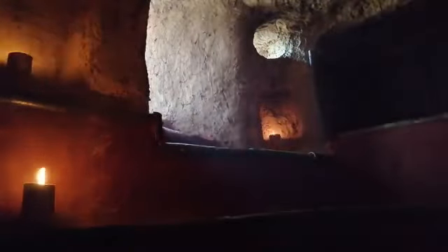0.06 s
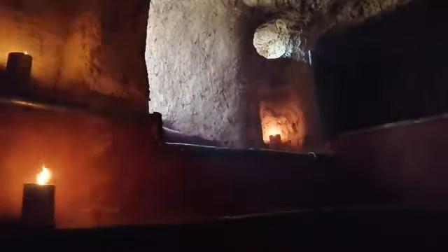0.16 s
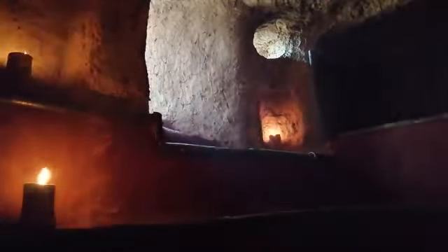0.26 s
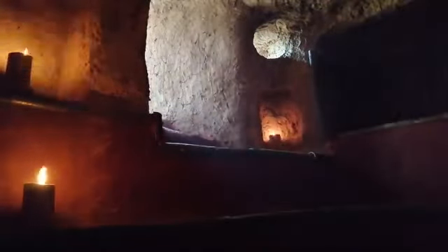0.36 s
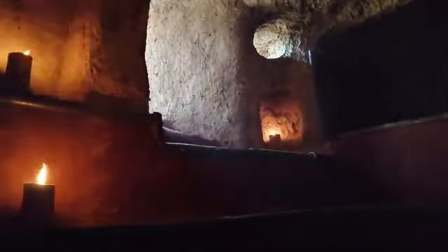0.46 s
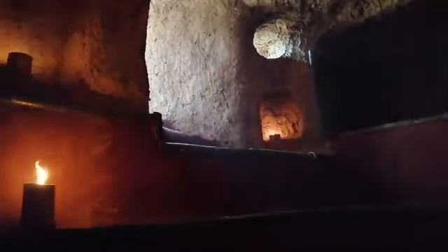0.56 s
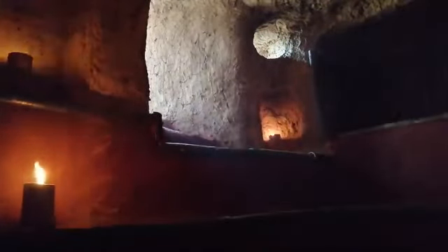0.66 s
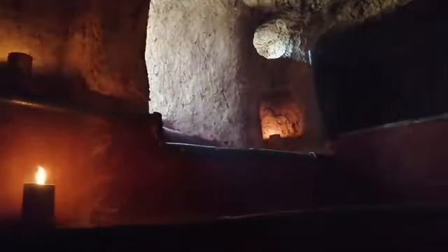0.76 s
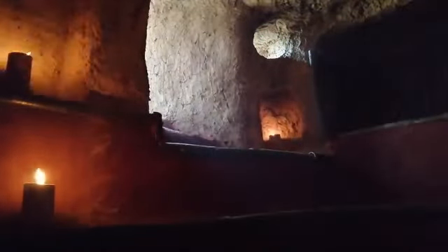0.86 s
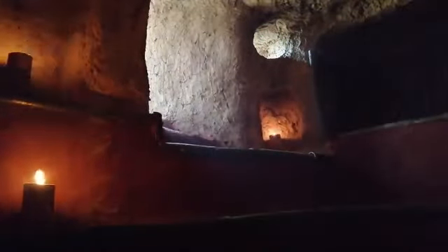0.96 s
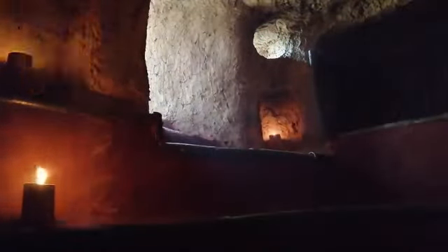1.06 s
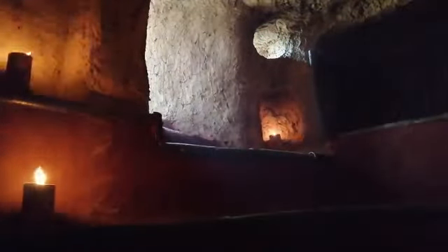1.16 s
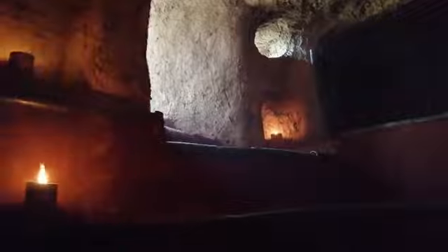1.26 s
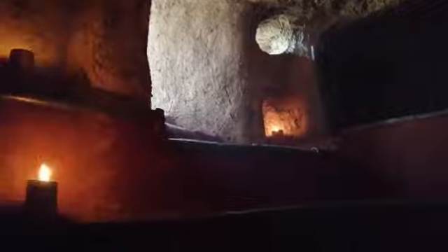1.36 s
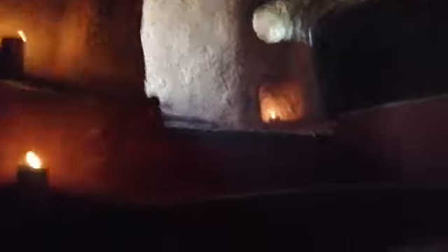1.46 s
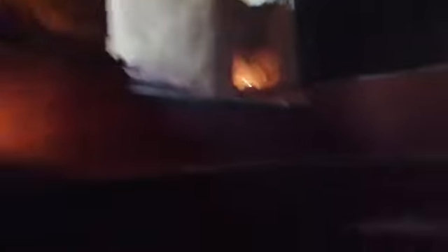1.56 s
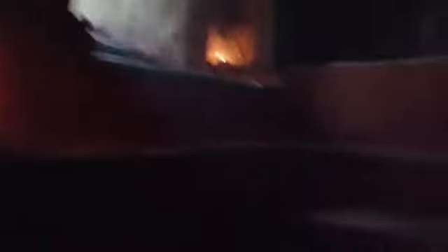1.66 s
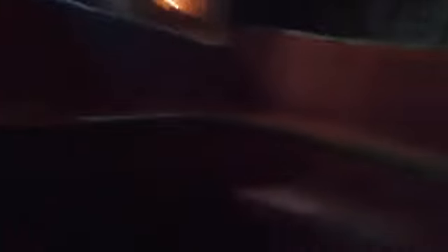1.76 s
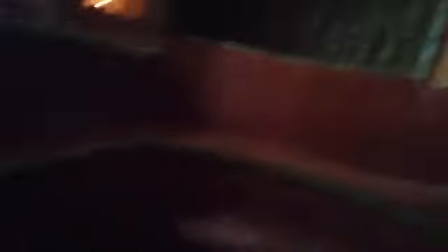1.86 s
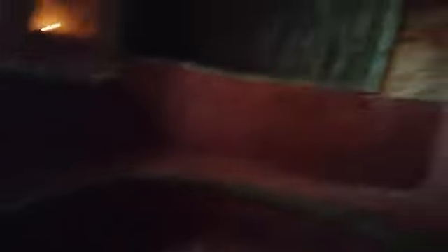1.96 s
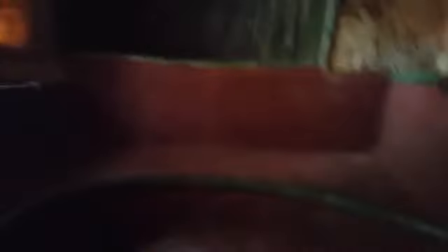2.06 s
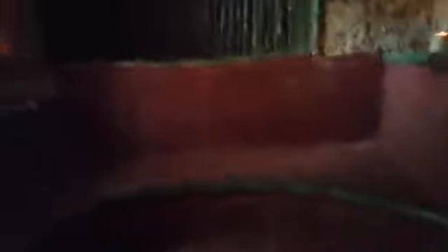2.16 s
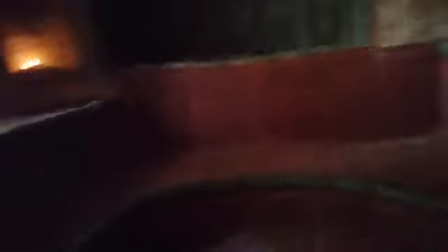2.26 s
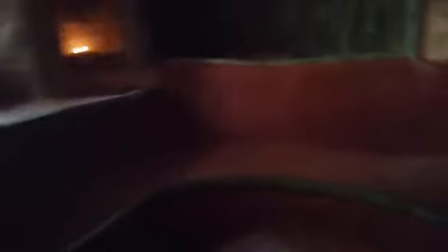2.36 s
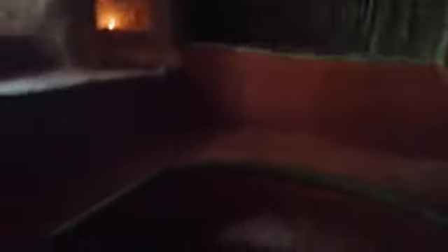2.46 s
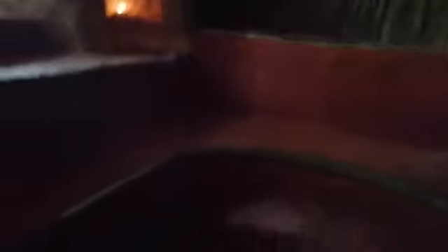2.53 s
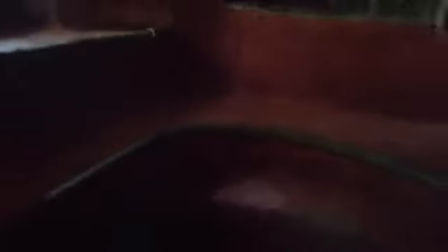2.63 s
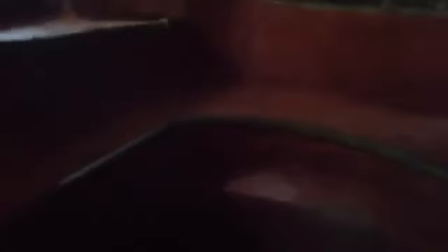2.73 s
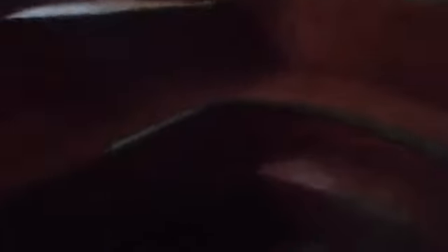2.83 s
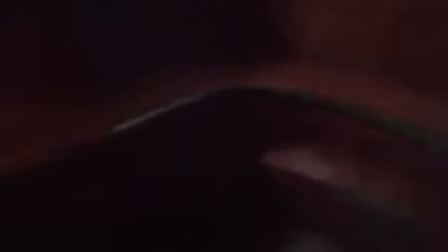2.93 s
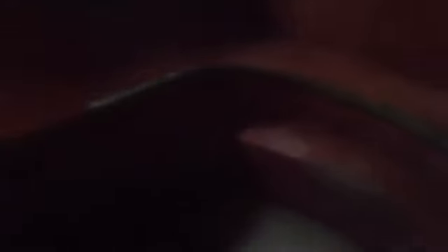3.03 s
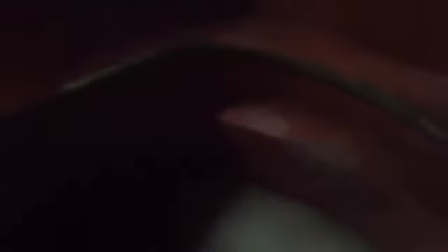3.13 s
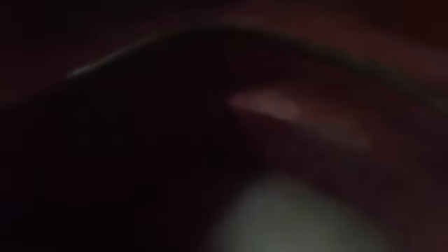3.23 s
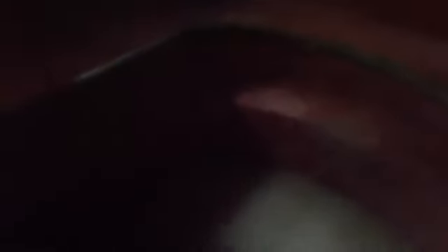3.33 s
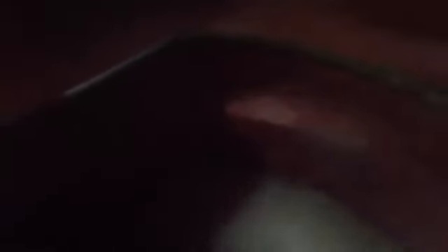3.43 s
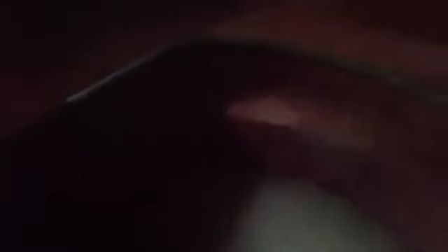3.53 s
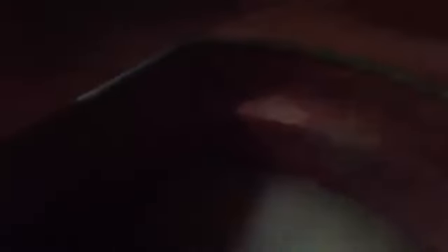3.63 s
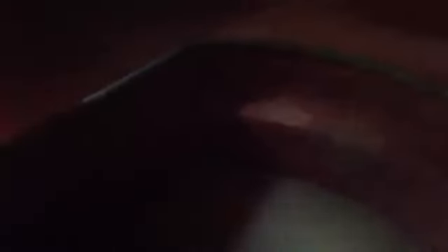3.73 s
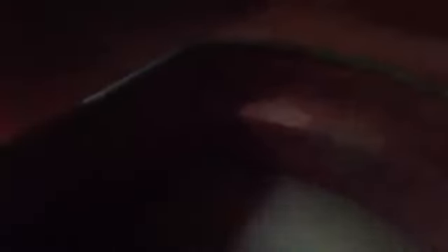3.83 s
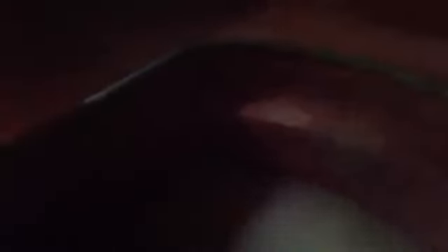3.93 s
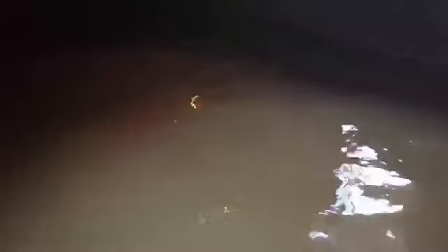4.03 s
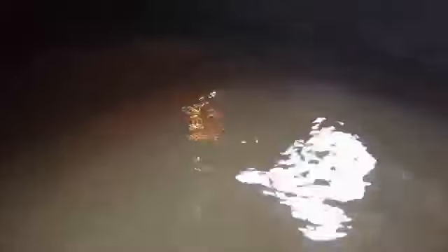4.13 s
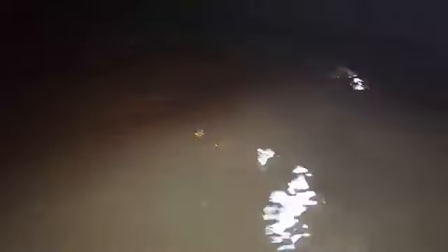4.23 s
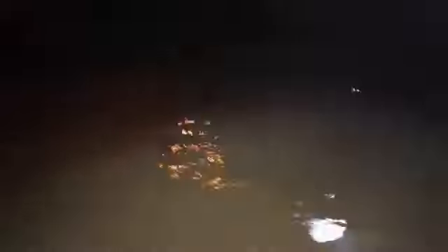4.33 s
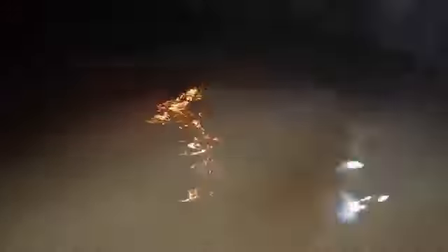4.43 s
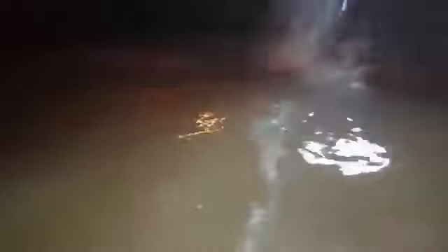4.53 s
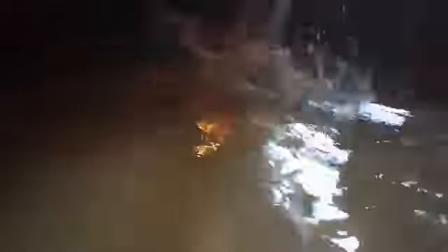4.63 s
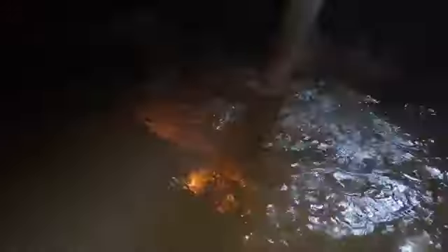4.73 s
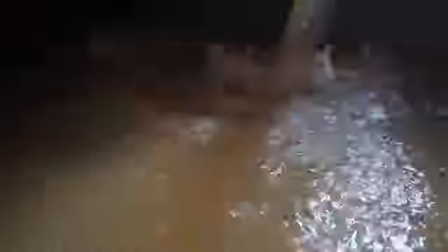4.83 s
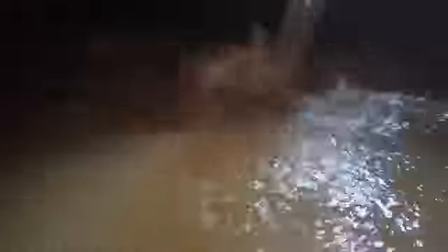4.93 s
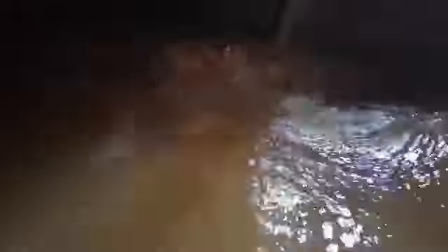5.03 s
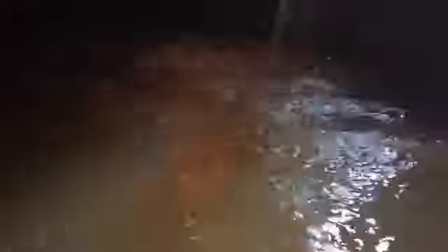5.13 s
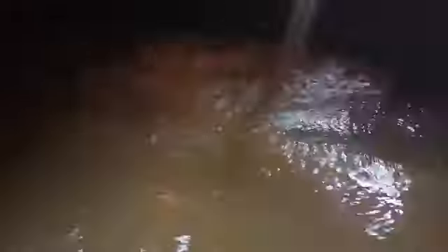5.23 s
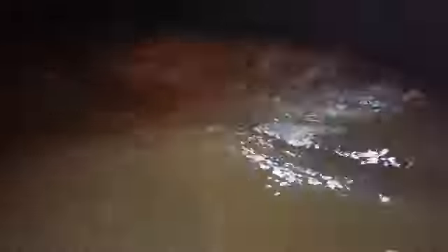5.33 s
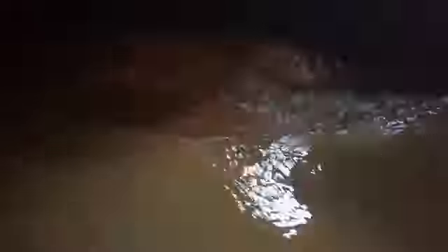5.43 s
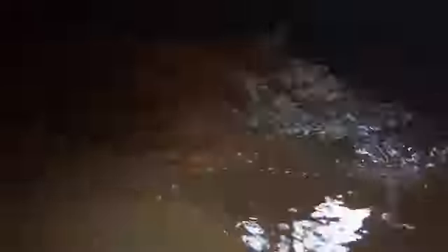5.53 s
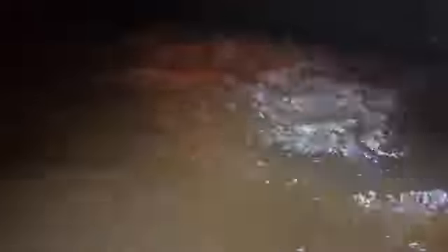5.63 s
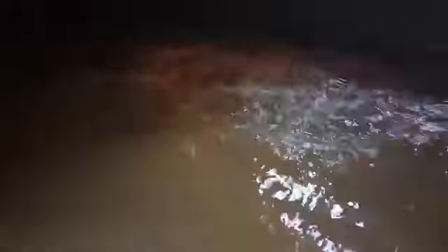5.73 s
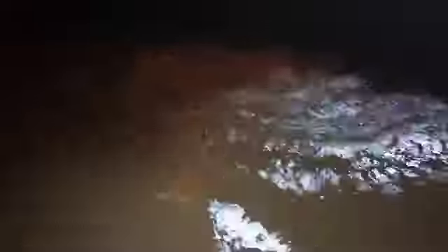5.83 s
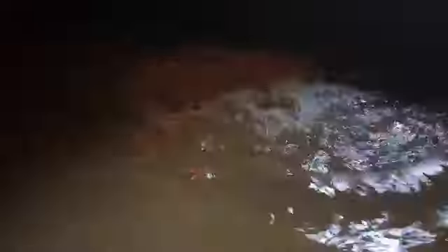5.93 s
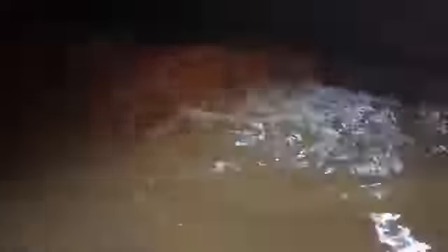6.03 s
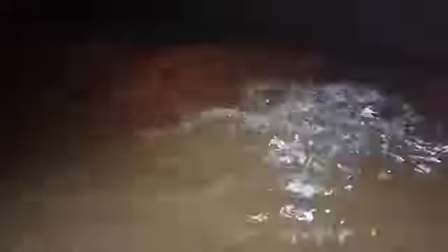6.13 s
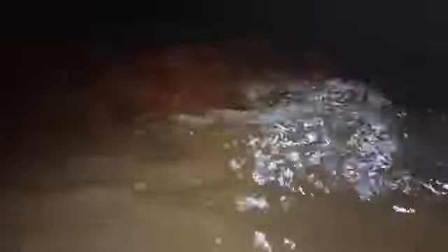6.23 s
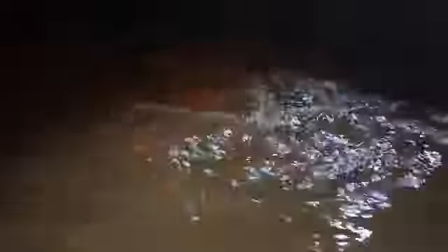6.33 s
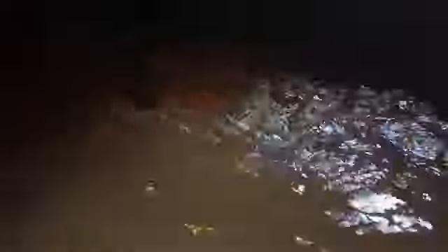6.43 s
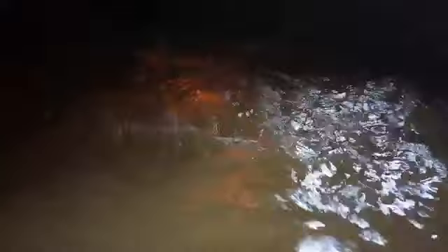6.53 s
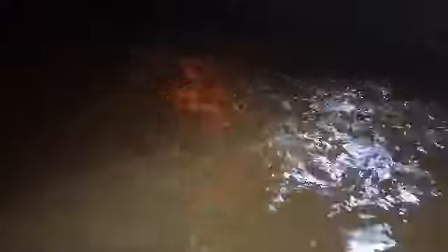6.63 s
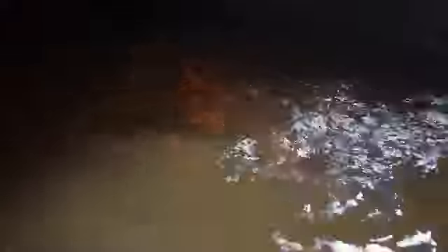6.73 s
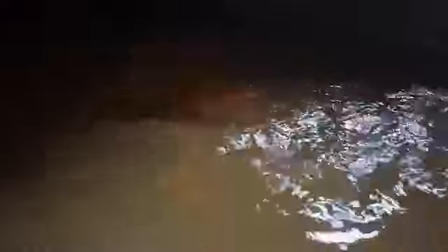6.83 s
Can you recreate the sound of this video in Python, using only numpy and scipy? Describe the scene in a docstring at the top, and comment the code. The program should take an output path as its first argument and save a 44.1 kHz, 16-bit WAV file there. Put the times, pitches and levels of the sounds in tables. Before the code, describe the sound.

Close to the water in a small hard-walled room: over a second of near-quiet room tone, then lively uneven sloshing with droplets, gurgles and rounded plops shifting slightly left and right. After a momentary hush and light ripples, a dense splashing pour, by far the loudest event, rings the basin over deep air-pocket booms. It stops fast, leaving gurgles, fine fizz and isolated drips fading away.

```python
"""A small stone pool in a plastered chamber: rumble, hiss and short soft noise swells, then a faint squeak.
Water is stirred: filtered noise and bubble clouds swish, noise bursts slap, decaying sines plop and boom.
The level drops out briefly; after two faint strokes a stream pours in for about a second: a dense
bubble cloud rings the basin over booming air pockets. Then the foam fizzes out with a few last drips."""
import sys
import numpy as np
from scipy import signal
from scipy.fft import rfft, irfft
from scipy.io import wavfile
from scipy.ndimage import uniform_filter1d

SR = 44100
rng = np.random.default_rng(int(sys.argv[2]) if len(sys.argv) > 2 else 0)


def unload_audio(sound):
    """Save the sound as a 16-bit wav file, at the path given as the first command line argument."""
    columns = np.transpose(np.atleast_2d(sound))
    # keep every value between -1 and 1, then stretch to whole-number steps
    steps = np.round(np.clip(columns, -1, 1) * 32767)
    wavfile.write(sys.argv[1], SR, steps.astype(np.int16))


N = 303496
TIME = np.arange(N) / SR


def amp(db):
    """Amplitude ratio from dB."""
    return 10 ** (np.asarray(db) / 20)


def unit(x):
    """Scale to rms 1."""
    return x / np.sqrt(np.mean(x ** 2) + 1e-20)


def read(points, hz):
    """Interpolate a table over frequency on a log axis."""
    f, value = np.transpose(points)
    return np.interp(np.log(hz + 1), np.log(f + 1), value)


def level(rows):
    """Gain at every sample from rows of (t/s, level/dB)."""
    return amp(np.interp(TIME, *np.transpose(rows)))


def during(start_s, end_s, fade_s=0.0041):
    """One between two times, with short linear fades centred on them."""
    inside_s = np.minimum(TIME - start_s, end_s - TIME)
    return np.clip(inside_s / fade_s + .5, 0, 1)


def shaped(x, gain):
    """Filter by a gain given as a function of Hz; rms 1."""
    hz = np.fft.rfftfreq(x.shape[-1], 1 / SR) + 1
    return unit(irfft(rfft(x) * gain(hz), x.shape[-1]))


def coloured(x, colour):
    """Filter by a colour table; rms 1."""
    return shaped(x, lambda hz: amp(read(colour, hz)))


def add(mix, start_s, sound):
    """Add a sound into the mix in place, cut at the end."""
    part = mix[:, max(round(start_s * SR), 0):][:, :sound.shape[-1]]
    part += sound[..., :part.shape[1]]


def bass_noise(colour, apart):
    """Stereo noise: the longer the wave, the more alike it reaches both ears."""
    mid, side = rng.standard_normal((2, N))
    width = np.minimum(np.fft.rfftfreq(N, 1 / SR) / 130, 1.6)
    side = apart * irfft(rfft(side) * width, N)
    return coloured(np.array([mid + side, mid - side]), colour)


def bubble(hz, t60_s, rise_oct_per_s, swell_s, lead_rad=0):
    """An air bubble rings at both ears as a decaying sine; its pitch slides up by at most an octave, or down
    without limit."""
    t = np.arange(int((swell_s + t60_s) * SR) + 8) / SR
    turns = np.cumsum(hz * 2 ** np.minimum(rise_oct_per_s * t, 1)) / SR
    swell = np.sin(np.pi / 2 * np.minimum(t / swell_s, 1)) ** 2
    decay = 1000. ** (-np.maximum(t - swell_s, 0) / t60_s)
    ear_phase = np.array([[lead_rad], [-lead_rad]]) / 2
    return swell * decay * np.sin(2 * np.pi * turns + ear_phase)


def cloud(rate, spread_db, cycles, mist, count=400):
    """Countless small bubbles, a few of them loud, over smooth noise; the smallest are the most numerous."""
    out = np.zeros((2, N))
    # rate scales the bubbles per second, in proportion to pitch; cycles is the mean t60 in periods at 2 kHz
    for hz, (length, bend, lead) in zip(np.geomspace(300, 14500, count), rng.random((count, 3))):
        t60_s = cycles * (.5 + length) / np.sqrt(hz * 2000)
        ring = bubble(hz, t60_s, 0.56 * bend / t60_s, 1 / hz, 2 * np.pi * lead)
        number = int(rate * TIME[-1] / count * hz / 2000) + 1
        starts_s = rng.uniform(0, TIME[-1], number)
        sizes = amp(spread_db * np.minimum(rng.exponential(1, number), 3))
        for start_s, size in zip(starts_s, sizes):
            add(out, start_s, size * hz ** .25 * ring)
    return unit(out) + mist * rng.standard_normal((2, N))


def chamber(x, wet_db):
    """Close plaster walls: a dense, short tail that differs at each ear."""
    # decay of the chamber: (f/Hz, t60/s)
    decay = [(100, 0.32), (500, 0.24), (2000, 0.28), (6000, 0.2), (15000, 0.13)]
    taps = rng.standard_normal((2, SR // 2)) * (rng.random((2, SR // 2)) < .1)
    taps[:, :130] = 0  # samples before the first reflection
    hz, t, z = signal.stft(taps, SR, nperseg=256)
    fall = 1000. ** (-t / read(decay, hz)[:, None])
    tail = signal.istft(z * fall, SR, nperseg=256)[1]
    tail /= np.linalg.norm(tail, axis=1, keepdims=True)
    wet = signal.fftconvolve(x, tail, axes=1)[:, :N]
    return (x + amp(wet_db) * wet) / np.hypot(1, amp(wet_db))


def water(flow, colour, grains):
    """Bubbles and noise follow the flow in three bands: deep bubbles, body and fine spray."""
    tone = coloured(grains, colour)
    deep = shaped(tone, lambda hz: 1 / np.hypot(1, (hz / 1200) ** 6))
    body = shaped(tone, lambda hz: 1 / (1 + (1200 / hz) ** 10 + (hz / 3500) ** 10))
    spray = shaped(tone, lambda hz: 1 / np.hypot(1, (3500 / hz) ** 6))
    return sum(part * gain for part, gain in zip((deep, body, spray), flow))


def surge(length_s, attack_s):
    """An envelope of one push: an attack, a sagging hold, a release, then a faint run-off."""
    sag_db_per_s, release_db_per_s = 7.5, 431
    runoff_db, runoff_db_per_s = -22, 63.5  # after a stroke: water trickling back
    t = np.arange(SR) / SR
    after = np.maximum(t - length_s, 0)
    release = np.maximum(amp(-release_db_per_s * after), amp(runoff_db - runoff_db_per_s * after))
    return np.minimum(t / attack_s, 1) * amp(-sag_db_per_s * t) * release


def stirring():
    """A smooth first swish of noise, then lumpy bubbling once the surface is broken."""
    # colour of the sloshing: (f/Hz, density/dB per Hz)
    slosh_colour = [(150, -36), (250, 0.5), (450, -8.5), (750, -4.5), (1100, -4), (1500, -2.5), (2500, 0),
                    (3500, -6), (5200, -5.5), (8300, -11), (11200, -12), (13000, -23), (15000, -30.5)]
    smooth_until_s, broken_from_s, smooth_bubble_share = 1.3, 1.75, 0.18  # share of power
    bubbling = chamber(cloud(rate=1100, spread_db=6.0, cycles=32.0, mist=0.44), wet_db=2.5)
    swish = rng.standard_normal((2, N))
    broken = np.interp(TIME, [smooth_until_s, broken_from_s], [smooth_bubble_share, 1])
    grains = np.sqrt(broken) * unit(bubbling) + np.sqrt(1 - broken) * swish
    return water(stroke_flow(), slosh_colour, grains)


def stroke_flow():
    """Gains of deep bubbles, body and spray; overlapping strokes add in power."""
    # strokes through the water: (start/s, length/s, attack/s, level/dB, deep/dB re level, spray/dB re level)
    strokes = [(0.96, 0.23, 0.18, -63.5, 0, -3.5), (1.21, 0.12, .1, -55.5, -5, -13.5),
               (1.336, 0.18, 0.026, -43.5, -7, -13), (1.748, 0.17, 0.052, -44.5, -13.5, -9),
               (1.882, 0.15, 0.034, -42, -25, -4), (2.054, 0.21, 0.014, -44, -13, -1),
               (2.294, 0.043, 0.0067, -43, -16, -5), (2.394, 0.18, 0.041, -48, -2.5, 4),
               (2.567, 0.1, 0.026, -57, -6.5, 2.5), (2.66, 0.07, 0.026, -46, -11, -4.5),
               (2.779, .11, 0.029, -60.5, -10, 9), (2.898, .1, 0.011, -51.5, -22, -1),
               (3.001, 0.091, 0.027, -47, -5.5, -1), (3.144, 0.091, 0.0094, -57, -18, 7.5),
               (3.218, 0.11, 0.053, -43, -21, -2), (3.485, 0.061, 0.022, -57, -14, -2),
               (3.577, 0.17, .05, -53, -12.5, 8), (3.738, 0.2, 0.04, -49, -24, -0.5),
               (3.813, 0.2, 0.037, -47.5, -10.5, -1), (4.36, 0.075, 0.027, -50, -14, -10),
               (4.453, 0.096, 0.047, -53, -16, -8)]
    power = np.zeros((3, N))
    for start_s, length_s, attack_s, db, deep_db, spray_db in strokes:
        gains = amp([db + deep_db, db, db + spray_db])
        add(power, start_s, np.outer(gains, surge(length_s, attack_s)) ** 2)
    return np.sqrt(power)


def pouring():
    """The stream churns up a dense cloud that rings the basin and leaves a fine fizzing foam."""
    # colours of stream and foam: (f/Hz, density/dB per Hz)
    pour_colour = [(150, -26), (270, -23.5), (360, -7.5), (440, -8.5), (680, 3), (1100, -4), (1700, 0),
                   (2600, -2), (3400, -10), (6500, -14), (8300, -18), (10800, -19.5), (13000, -28),
                   (15000, -41.5)]
    foam_colour = [(150, -9), (300, -6.5), (500, -9), (800, -3), (1300, -7), (2400, -0.5), (3500, -5),
                   (6500, -6.5), (8300, -9.5), (10800, -9), (13000, -18), (15000, -25)]
    churn = chamber(cloud(rate=3800, spread_db=2.5, cycles=25.0, mist=.5), wet_db=0)
    churn = lumpy(churn, patchy_db=1.5)
    fizz = chamber(cloud(rate=890, spread_db=4.5, cycles=11.6, mist=1.0), wet_db=5.5)
    stream = water(pour_flow(), pour_colour, shaped(churn, basin))
    return stream + water(foam_flow(), foam_colour, fizz)


def pour_flow():
    """Gains of deep bubbles, body and spray under the falling stream."""
    # the falling stream: (t/s, level/dB, deep/dB re level, spray/dB re level)
    pour = [(4.53, -56.5, -11, 8.5), (4.572, -27.5, -17.5, 2.5), (4.612, -25, -4, -1),
            (4.982, -22.5, -2, -8.5), (5.036, -29, -0.5, -8), (5.148, -26, -5, -10.5),
            (5.23, -30.5, 2.5, -3.5), (5.284, -25.5, -5, -8.5), (5.402, -31.5, -3, -4),
            (5.43, -25, -5.5, -7), (5.466, -37, 0, -8), (5.528, -39.5, -15, 0), (5.578, -49, 3.5, 0.5),
            (5.664, -41, -3, -6), (5.82, -55.5, -3, 3)]
    t, db, deep_db, spray_db = np.transpose(pour)
    gains = [level(np.c_[t, db + share_db]) for share_db in (deep_db, 0, spray_db)]
    return np.array(gains) * during(t[0], t[-1])


def lumpy(x, patchy_db):
    """Bubbles tear off in clumps: each band surges by itself for a few hundredths of a second."""
    z = signal.stft(x, nperseg=1024, noverlap=768)[2]
    clumps = uniform_filter1d(rng.standard_normal(z.shape[1:]), size=7, axis=0)
    clumps = uniform_filter1d(clumps, size=7, axis=1)
    return signal.istft(z * amp(patchy_db * unit(clumps)), nperseg=1024, noverlap=768)[1][:, :N]


def basin(hz):
    """Gain of the basin's resonances under the stream."""
    # resonances: (centre f/Hz, width/Hz, lift/dB)
    modes = [(369, 19, 7), (614, 23, -2.5), (687, 38, 2.5), (760, 26, -3.5), (1080, 180, 6), (1360, 27, 0),
             (1684, 27, 6), (2050, 53, 1)]
    return 1 + sum((amp(db) - 1) / (1 + (2 * (hz - centre_hz) / width_hz) ** 2)
                   for centre_hz, width_hz, db in modes)


def foam_flow():
    """Gains of deep bubbles, body and spray as the foam dies, ever faster and thinner."""
    start_s, life_s, fade_power = 5.81, 0.93, 1.5
    body_db, deep_db, spray_db = -52.5, -9, -1  # deep and spray re body
    # loss over that life, large bubbles bursting first: (deep/dB, body/dB, spray/dB)
    loss_db = (23.5, 16, 7.5)
    age = np.maximum(TIME - start_s, 0) / life_s
    fresh_db = body_db + np.array([[deep_db], [0], [spray_db]])
    return amp(fresh_db - np.outer(loss_db, age ** fade_power)) * during(start_s, np.inf)


def gurgles(width=0.19):
    """Bubbles of like size jostle around one pitch, which slides as their pocket changes size."""
    # swarms from a pocket that closes or opens: (start/s, length/s, first f/Hz, last f/Hz, dry level/dB)
    swarms = [(1.68, 0.055, 1150, 1253, -58.5), (1.683, 0.046, 2500, 2610, -64.5),
              (1.771, .11, 1750, 1124, -39), (1.83, 0.17, 1305, 2120, -44), (2.09, 0.091, 593, 700, -48),
              (2.109, 0.049, 1349, 1622, -39), (2.202, 0.063, 2500, 2860, -42),
              (2.401, 0.054, 618, 1224, -42.5), (2.471, 0.12, 2540, 2890, -40.5),
              (3.578, 0.12, 2050, 2843, -43), (3.609, 0.066, 999, 956, -52.5),
              (3.69, .067, 2200, 2463, -45.5), (3.783, 0.0653, 880, 1192, -39.5),
              (3.87, .125, 1803, 2200, -44.5), (4.258, .05, 1740, 1500, -60.5),
              (4.8, 0.13, 598, 431, -30.5), (5.559, 0.0844, 480, 765, -42),
              (5.719, 0.072, 2410, 2640, -48.5), (6.033, 0.072, 644, 858, -48),
              (6.041, 0.054, 1493, 1032, -48), (6.287, 0.072, 1850, 2100, -54.5),
              (6.437, 0.064, 1057, 1370, -51.5)]
    out = np.zeros((2, N))
    for start_s, length_s, first_hz, last_hz, db in swarms:
        pitch_hz = np.geomspace(first_hz, last_hz, int(length_s * SR))
        jostle = shaped(rng.standard_normal((4, 8192)),
                        lambda hz: 1 / (1 + (hz / (width * first_hz)) ** 4))[:, :len(pitch_hz)]
        carrier = np.exp(2j * np.pi * np.cumsum(pitch_hz) / SR)
        swarm = ((jostle[:2] + 1j * jostle[2:]) * carrier).real
        add(out, start_s, amp(db) * unit(swarm) * signal.windows.tukey(len(pitch_hz), .7))
    return chamber(out, wet_db=-10.5)


def plops():
    """Larger bubbles ring out one by one as sliding, decaying sines."""
    # single bubbles: (start/s, f/Hz, dry peak/dB, t60/s, rise/octaves per s)
    single_bubbles = [ (1.78, 2310, -41, .032, 16), (1.785, 1740, -35.5, .05, 3),
                      (1.805, 759, -48, 0.49, 2.5), (1.835, 1208, -27.5, 0.056, 1.5),
                      (1.926, 1486, -32, .05, 4.5), (2.062, 1794, -31, 0.083, 7),
                      (2.1, 601, -42, 0.44, 0.7), (2.293, 2036, -34, 0.041, 3),
                      (2.303, 3800, -33, .016, -4), (2.414, 687, -32.5, 0.029, 2.5),
                      (2.522, 1380, -30.5, 0.037, 5), (2.66, 2880, -32, 0.043, 2),
                      (2.784, 1003, -39, 0.13, 17.5), (2.955, 1770, -41, 0.14, 1),
                      (3.301, 858, -39.5, 0.083, 3.5), (3.532, 1950, -37, 0.028, -1),
                      (3.608, 2250, -34.5, 0.025, 1), (3.646, 2643, -34.5, 0.096, 5.5),
                      (3.689, 290, -44, 0.12, 3.5), (3.796, 924, -40, .16, 4),
                      (3.858, 1344, -34.5, .06, 0.5), (3.89, 1830, -31.5, 0.054, 4.5),
                      (3.948, 645, -44, 0.053, -1), (4.567, 1424, -21, 0.066, -3),
                      (4.608, 743, -24, 0.56, 1), (4.632, 364, -34, 0.62, -0.5),
                      (4.815, 667, -19, 0.084, 0), (4.912, 603, -23, 0.073, 7),
                      (5.575, 548, -37.5, 0.1, 1.5), (5.655, 674, -46, 0.14, 1.5),
                      (5.739, 2470, -43, .097, 3), (6.068, 737, -43, 0.072, 5), (6.508, 923, -52, 0.2, 4)]
    out = np.zeros((2, N))
    leads_rad = rng.uniform(-np.pi / 2, np.pi / 2, len(single_bubbles))
    for (start_s, hz, db, t60_s, rise), lead_rad in zip(single_bubbles, leads_rad):
        add(out, start_s, amp(db) * bubble(hz, t60_s, rise, swell_s=0.0048, lead_rad=lead_rad))
    return chamber(out, wet_db=-3.0)


def slaps():
    """A sheet of water hits the surface and breaks into a quickly dying noise burst of droplets."""
    # slaps: (start/s, relative level/dB, centre f/Hz, width/octaves, t60/s)
    sheets = [(1.3518, -41, 2720, 0.58, 0.021), (1.5072, -30.5, 1240, 0.83, .017),
              (1.9, -42, 5630, .56, 0.12), (2.056, -37, 6300, 0.4, 0.05), (2.2942, -41, 2800, 0.76, .043),
              (2.321, -39.5, 940, 0.92, 0.054), (2.432, -38.5, 4750, .27, 0.26),
              (2.53, -24.5, 3130, 0.55, 0.039), (2.66, -39.5, 5100, 0.45, 0.094),
              (2.819, -35, 5530, 0.14, 0.02), (2.912, -43, 5060, 1, 0.14),
              (3.0141, -30.5, 1960, 0.37, .021), (3.0453, -29, 1800, 0.5, 0.037),
              (3.121, -45.5, 8800, 0.47, 0.06), (3.161, -40.5, 3530, 0.99, 0.046),
              (3.23, -35, 2100, 0.23, .022), (3.297, -32, 4440, 0.32, 0.071),
              (3.399, -49.5, 6450, .29, 0.049), (3.516, -43, 4040, 0.68, 0.055),
              (3.569, -45.5, 4020, 0.77, 0.14), (3.678, -35, 4900, .42, 0.053),
              (3.868, -40, 11000, 0.3, 0.042), (3.976, -34, 1560, 0.71, 0.039),
              (4.366, -46.5, 1550, 0.59, 0.17), (4.541, -30, 7800, 0.42, .03),
              (4.638, -22, 2440, 1.3, 0.18), (4.821, -22, 1400, .83, 0.026), (5.418, -33, 4300, 1.3, 0.14),
              (5.511, -34, 3500, .79, 0.088), (5.636, -20, 5000, 0.47, 0.013)]
    out, t = np.zeros((2, N)), np.arange(8192) / SR
    for start_s, db, centre_hz, octaves, t60_s in sheets:
        drops = rng.standard_normal((2, len(t))) * amp(2.4 * rng.standard_normal(len(t)))
        burst = shaped(drops, lambda hz: 1 / (1 + (np.log2(hz / centre_hz) / octaves) ** 2)
                       / np.hypot(1, hz / 9000))
        envelope = np.minimum(t / 0.0011, 1) * 1000. ** (-t / t60_s)
        add(out, start_s, amp(db) * burst * envelope)
    return amp(3.5) * chamber(out, wet_db=-6.0)


def gulps():
    """Big air pockets swell and boom under the surface as low decaying sines."""
    # air pockets: (start/s, f/Hz, peak/dB, t60/s)
    pockets = [(2.15, 66, -34, 0.25), (2.169, 116, -29, 0.063), (2.319, 256, -34.5, 0.045),
               (2.705, 232, -36.5, 0.084), (3.047, 254, -24, 0.023), (4.639, 155.5, -26.5, 0.35),
               (4.802, 84.8, -26.5, 0.48), (4.93, 142.9, -18.5, 0.4), (4.94, 52.5, -40, .4),
               (5.089, 56, -38.5, 0.81), (5.209, 161.6, -30.5, 0.54), (5.328, 142.4, -28, 0.62),
               (5.406, 53.1, -23, 0.53), (5.495, 177.8, -28, 0.42), (5.509, 88.4, -25.5, .32)]
    # lead of the left ear in the chamber's bass field: (f/Hz, phase/rad)
    ear_lead = [(55, .2), (87, 1.76), (143, 0.73), (255, 1.37)]
    swell_share = .1  # of t60
    out = np.zeros((2, N))
    for start_s, hz, db, t60_s in pockets:
        add(out, start_s, amp(db) * bubble(hz, t60_s, 0, swell_share * t60_s, read(ear_lead, hz)))
    return out


def depths():
    """Strokes heave the water, and a low rumble follows them with a lag; the plunge reaches the depths a little
    late."""
    # displaced water heaving up and falling back: (crest/s, level/dB, swell time constant/s)
    heaves = [(1.44, -48, 0.076), (1.512, -39.5, 0.016), (2.18, -49.5, 0.021), (2.325, -44, 0.015),
              (2.53, -51, 0.028), (2.729, -42, 0.07), (2.97, -53, .1), (3.06, -41, 0.082),
              (3.175, -48, 0.047), (3.7, -62.5, 0.13), (3.96, -58, 0.079)]
    # colours of the heaving and the low rumble: (f/Hz, density/dB per Hz)
    heave_colour = [(20, -14), (55, -4), (100, 0.5), (160, 2), (220, 0.5), (280, -5), (380, -7.5),
                    (600, -26), (1500, -66.5)]
    low_colour = [(15, -0.5), (30, -3.5), (55, 6), (80, -12.5), (140, -28), (400, -41)]
    fall_s, wake_db = 0.021, -20  # the wake is the low heave that every stroke drags along
    plunge_db, plunge_delay_s, plunge_power = -21, 0.053, 0.65  # follows the stream less steeply
    plunge_end_s, plunge_fade_s = 5.75, 0.13
    low_db, low_lag_s, low_floor_db = -6, 0.14, -75.5  # low_db is re the lagging heave

    heave = amp(wake_db) * stroke_flow()[1]
    for crest_s, db, swell_s in heaves:
        time_constants = np.maximum((crest_s - TIME) / swell_s, (TIME - crest_s) / fall_s)
        heave = np.hypot(heave, amp(db) * np.exp(-time_constants))
    arriving = np.interp(TIME - plunge_delay_s, TIME, pour_flow()[1])
    plunge = amp(plunge_db) * arriving ** plunge_power * during(0, plunge_end_s, plunge_fade_s)
    low_gain = amp(low_floor_db) + amp(low_db) * lagging(heave, low_lag_s)
    heaving = bass_noise(heave_colour, apart=0.45) * (heave + plunge)
    return heaving + bass_noise(low_colour, apart=0.27) * low_gain


def lagging(gain, lag_s):
    """Follows a level with a lag: a one-pole smoother."""
    keep = np.exp(-1 / (lag_s * SR))
    return signal.lfilter([1 - keep], [1, -keep], gain)


def squeak(waver=0.022):
    """A faint, hoarse squeak: a few harmonics of one wavering pitch."""
    start_s, length_s, pitch_hz = 1.03, 0.12, 700
    # harmonics from the first up: (dry level/dB)
    harmonics_db = (-62.5, -72, -63, -75)
    out, window = np.zeros((2, N)), signal.windows.tukey(int(length_s * SR), .6)
    wobble = unit(uniform_filter1d(rng.standard_normal(SR), size=300))[:len(window)]
    turns = np.cumsum(pitch_hz * (1 + waver * wobble)) / SR
    tone = sum(amp(db) * np.sin(2 * np.pi * k * turns) for k, db in enumerate(harmonics_db, 1))
    add(out, start_s, window * tone)
    return chamber(out, wet_db=1)


def background():
    """The chamber's rumble and even hiss as coloured noise, with short soft noise swells early on."""
    # colours of hiss (noise swells too) and rumble: (f/Hz, density/dB per Hz)
    hiss_colour = [(100, -2.5), (400, -4), (900, -4.5), (2300, -0.5), (3500, -5.5), (8000, -11.5),
                   (11000, -14.5), (13000, -24), (15000, -31)]
    rumble_colour = [(15, -18), (40, -14), (60, -1), (85, -1), (115, 3.5), (155, -3), (210, -17),
                     (320, -25.5), (800, -63)]
    # short soft noise swells, the first already sounding at the start: (start/s, length/s, level/dB)
    noise_swells = [(0, .04, -63), (.05, 0.12, -69.5), (0.196, .07, -67.5), (0.583, 0.24, -69),
                    (0.956, 0.27, -68.5)]
    rumble_db, drift_db_per_s, hiss_db = -62, -0.72, -70.5
    hiss, swell_noise = coloured(rng.standard_normal((2, 2, N)), hiss_colour)
    rumble = bass_noise(rumble_colour, apart=0.3) * amp(rumble_db + drift_db_per_s * TIME)
    swell_power = np.zeros((1, N))
    for start_s, length_s, db in noise_swells:
        add(swell_power, start_s, (amp(db) * surge(length_s, attack_s=0.0083)) ** 2)
    return rumble + amp(hiss_db) * hiss + swell_noise * np.sqrt(swell_power)


def scene():
    """The stirring moves a little from side to side; the pour, the depths and the room surround it."""
    # place of the stirring: (t/s, left minus right/dB)
    slosh_side = [(0, 2), (1.5, -1.5), (2.2, .5), (3.2, 0), (3.7, 2.5), (4.3, 1)]
    place = level(slosh_side) ** np.array([[.5], [-.5]])
    stirred = place * (stirring() + gurgles() + plops() + slaps())
    return stirred + pouring() + gulps() + depths() + squeak() + background()


def record(dry):
    """The sound drops out briefly before the pour, deepest in the middle; then the band limit."""
    # drop-out and the deeper hush within it: (start/s, end/s)
    silence = (3.994, 4.08)
    hush = (4.02, 4.065)
    silence_db, hush_db, edge_hz = -19, -19, 15200  # the two drops add up
    gated = dry * amp(silence_db * during(*silence) + hush_db * during(*hush, fade_s=.016))
    lowpass = signal.firwin(511, edge_hz, window=("kaiser", 9), fs=SR)
    return signal.oaconvolve(gated, lowpass[None], "same")


dry = scene()
out = record(dry)
unload_audio(out)
```